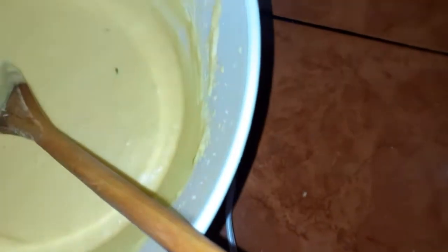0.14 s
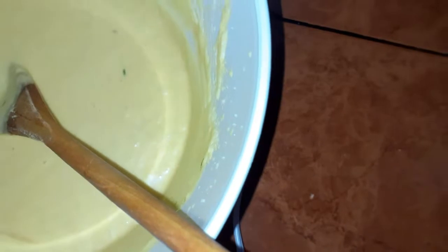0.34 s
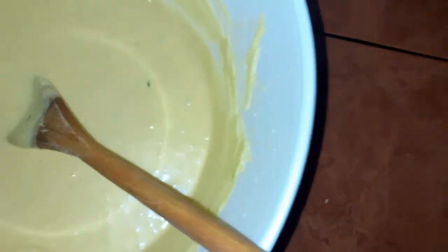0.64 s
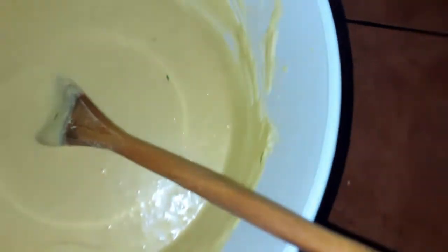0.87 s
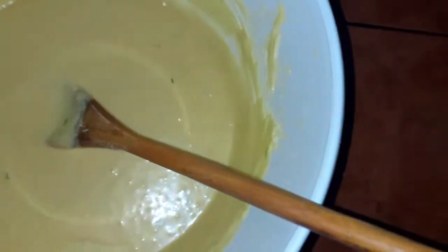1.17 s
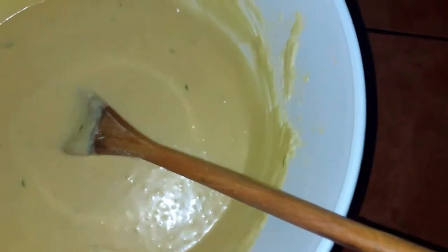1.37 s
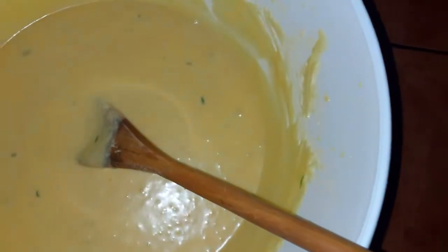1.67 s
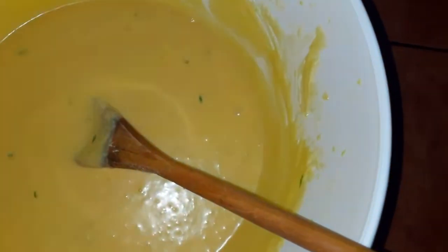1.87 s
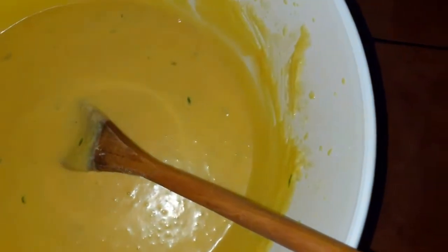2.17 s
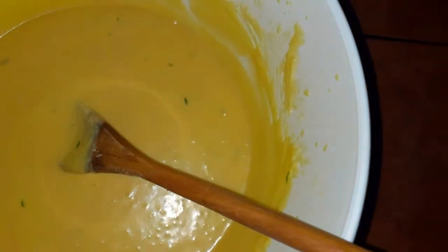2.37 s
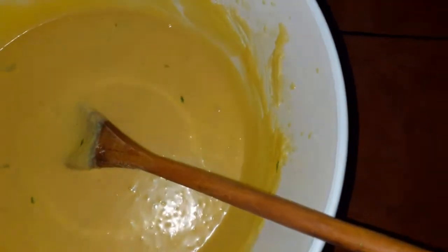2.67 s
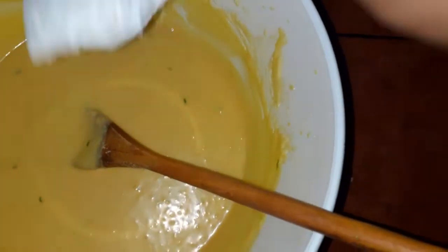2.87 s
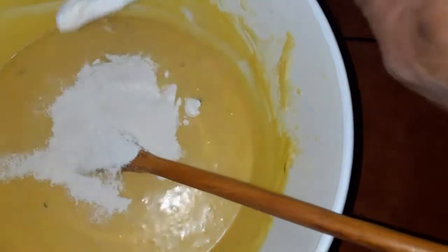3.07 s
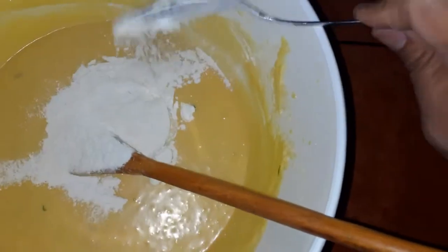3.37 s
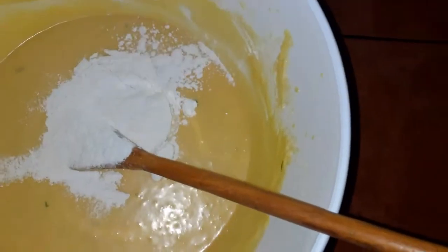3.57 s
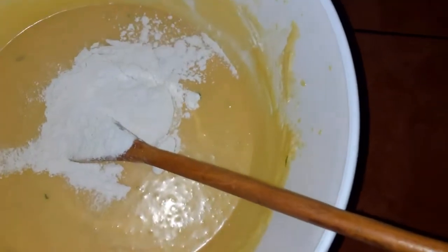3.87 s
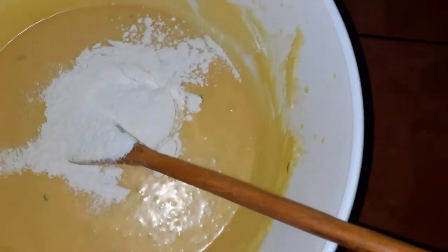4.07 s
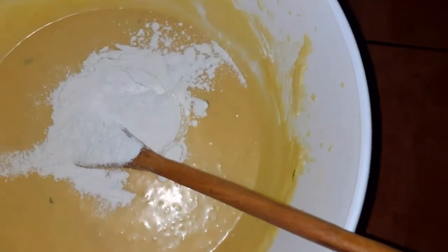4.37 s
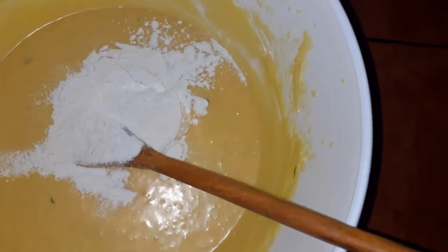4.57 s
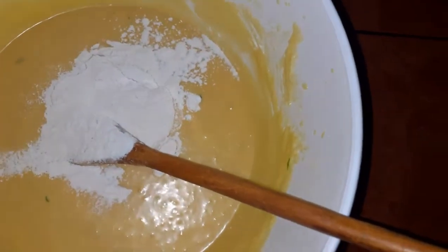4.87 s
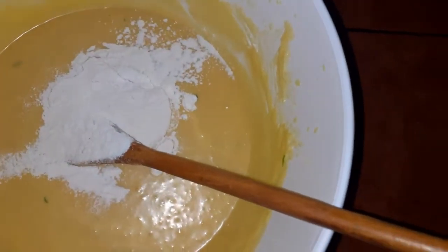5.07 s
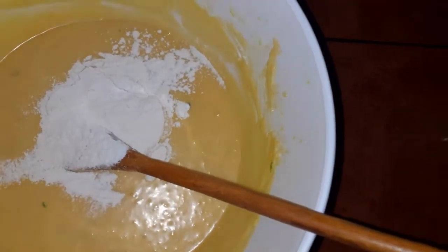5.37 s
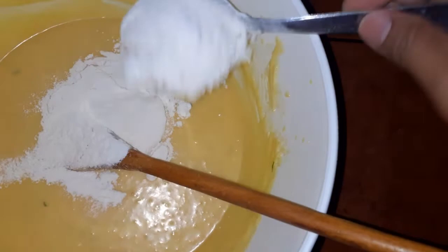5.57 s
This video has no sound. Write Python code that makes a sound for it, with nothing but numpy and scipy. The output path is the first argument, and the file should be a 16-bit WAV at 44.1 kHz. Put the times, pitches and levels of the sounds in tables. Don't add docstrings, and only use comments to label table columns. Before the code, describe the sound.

In a quiet, humming kitchen, a paper flour bag scuffs softly while a spoon knocks hollowly on a plastic tub, with small light taps.

```python
import sys
import numpy as np
from scipy import signal
from scipy.io import wavfile
from scipy.ndimage import uniform_filter1d

SR = 44100
rng = np.random.default_rng(int(sys.argv[2]) if len(sys.argv) > 2 else 0)


def log_audio(samples):
    frames = np.atleast_2d(samples).T
    limited = np.clip(frames, -1, 1)
    pcm = np.round(limited * 32767).astype(np.int16)
    wavfile.write(sys.argv[1], SR, pcm)


def magnitude_from_level(level_db):
    exponent = np.asarray(level_db, float) / 20
    return 10 ** exponent


N = 252384
SPAN = 36000
LAG = 14

# (frequency [Hz], level [dB per Hz])
WASH_COLOUR = [(24, -23.5), (40, -3), (64, -1), (80, -6), (109, 3), (158, -10.5), (193, -15.5), (295, -5),
               (342, -5.5), (578, -27), (1080, -29.5), (2010, -36.5), (3760, -61), (7560, -44.5),
               (15600, -61)]
# (frequency [Hz], likeness [-1 to 1])
WASH_LIKENESS = [(60, 1), (99, 0.82), (160, 1), (270, 0.73), (450, 0.69), (740, 0.01), (1220, -0.73),
                 (2010, -0.6), (3330, -1.4), (5500, -1.5), (9080, -0.42), (15000, 0.94)]
# (frequency [Hz], left minus right [dB])
WASH_BALANCE = [(60, -8), (110, 3), (200, -4.5), (380, -2), (700, -9.5), (1290, -9.5), (2380, -15.5),
                (4400, -5), (8120, -9.5), (15000, 8.5)]
# (time [s], level [dB])
WASH_SWELL = [
    (0.14, -52),
    (0.52, -54.5),
    (2.6, -54.5),
    (2.82, -49.5),
    (3.51, -55),
    (3.661, -49),
    (4.371, -64),
    (4.78, -61),
    (5.05, -51),
    (5.72, -53.5),
]
# (frequency [Hz], level [dB], width of the wavering [Hz])
FRIDGE_HUM = [
    (60.101, -63, 0.14),
    (111.3, -59, 30),
    (290.3, -62, 12),
    (346, -69.5, 20),
]

# (frequency [Hz], time to fall 60 dB [s])
ROOM_DECAY = [(150, 0.57), (400, 0.79), (1040, 0.79), (2760, 0.84), (4500, 0.87), (6000, 0.77),
              (12000, 0.7)]
# (frequency [Hz], likeness [-1 to 1])
ROOM_LIKENESS = [(60, 1), (99, 1), (160, 0.73), (270, 1), (450, 0.78), (740, 0.09), (1220, -0.0049),
                 (2010, 0.08), (3330, -0.043), (5500, -0.1), (9080, 1), (15000, 0.87)]
# (frequency [Hz], left minus right [dB])
ROOM_BALANCE = [(60, -2), (110, 0), (200, -3), (380, -2.5), (700, 0.5), (1290, -4), (2380, -4.5),
                (4400, -3.5), (8120, -6), (15000, 4.5)]
# (delay [ms], level [dB])
CLOSE_ECHOES = [(4.1, -16), (8.3, -25.5), (11, -29), (17, -19)]
# (frequency [Hz], level [dB])
CRACK_COLOUR = [(300, -45.5), (3000, -9.5), (4000, 5), (8500, -4), (9500, -16), (16000, -13)]

# (time [s], level [dB], treble [dB], hiss [dB], stroke length [s])
BAG_SCUFFS = [(-.04, -38, -14, -18, 0.06735), (4.261, -59.5, -19, -9.5, 0.042), (4.76, -67, 0, 6, .2),
              (4.85, -51.5, -10.5, -18.5, 0.0946), (1.596, -55, -29, -34, 0.023),
              (2.364, -40, -20.5, -20.5, 0.07), (2.628, -32, -24, -29.5, 0.042),
              (2.852, -37, -17, -27.5, 0.025), (3.508, -44, -19, -20, 0.036),
              (3.597, -41.5, -12.5, -30, 0.36), (3.844, -34.5, -11, -23.5, 0.038),
              (4.9545, -29.5, -22, -31, 0.026), (5.125, -26, -11.5, -22, 0.027),
              (5.258, -24, -12.5, -25, 0.011)]
# (time [s], level [dB], treble [dB], hiss [dB], stroke length [s])
LOOSE_PAPER_SCUFFS = [
    (3.542, -38.5, -10.5, -22, 0.047),
    (5.643, -41.5, -15, -27, 0.04),
]
# (frequency [Hz], level [dB per Hz])
PAPER_COLOUR = [(59, -35.5), (100, -8), (197, -19), (350, 0), (389, -9), (662, -12), (910, -9),
                (1080, -14.5), (1550, -13), (1760, -11.5), (3120, -18), (8110, -18.5), (10000, -32.5),
                (13200, -29), (16000, -44.5)]
# (time [s], level [dB], pitch [Hz], stroke length [s])
RINGING_FOLDS = [(2.635, -53, 2840, 0.0455), (2.64, -63, 6702, .04), (2.856, -51, 3860, .02),
                 (3.547, -50.5, 4340, 0.039), (3.582, -45.5, 1200, 0.013), (5.133, -32, 1528, 0.05635),
                 (5.143, -59, 900, 0.0596), (5.269, -33.5, 1524, 0.022), (5.327, -61, 1100, .06),
                 (4.801, -67, 4360, 0.13), (4.95, -45, 1680, .008)]

# (time [s], blow [dB], crack [dB], sent to the room [dB])
LID_TAP_EVENTS = [
    (0.1197, -24, -17, -11),
]
# (frequency [Hz], left [dB], right [dB], time to fall 60 dB [s], rise [ms])
LID_TONES = [(370, -1, 0.5, 0.031, 0.61), (974, -10, -14, .03, .6), (1930, -18, -1, 0.014, .4)]

# (time [s], blow [dB], crack [dB])
WOOD_EVENTS = [
    (0.319, -18, -1.5),
    (0.485, -11.5, -10.5),
]
# (frequency [Hz], left [dB], right [dB], time to fall 60 dB [s], rise [ms])
WOOD_TONES = [(155.3, -13.5, -12.5, 0.19, 0.33), (326, -6.5, -7.5, 0.11, 0.53), (594, -21, -2.5, 0.03, 1.5),
              (839, -2.5, -9.5, 0.066, 0.72), (967, 0, 0, 0.039, 1.54), (1627, -18, -4.5, 0.027, 1.1),
              (1980, 1, 6.5, 0.014, 0.28)]
# (frequency [Hz], level [dB per Hz])
WOOD_ROOM_COLOUR = [(59, -32), (100, -8), (206, -21), (295, -2.5), (381, -9.5), (676, -12.5), (970, -1.5),
                    (1420, -23.5), (2130, -17.5), (3860, -22.5), (9820, -43.5), (14400, -44.5),
                    (16000, -53)]

# (time [s], blow [dB], crack [dB], thud [dB])
FREE_TAPS = [
    (2.9794, -24, -14, 6),
    (2.9930, -24.5, -19, 0),
    (4.9554, -25, -19.5, 2),
]
# (time [s], blow [dB], crack [dB], thud [dB])
HELD_TAPS = [
    (2.9848, -28.5, -20, -6),
    (5.1294, -24, -16, 1),
    (5.263, -17, -15, -4),
]
# (frequency [Hz], left [dB], right [dB], time to fall 60 dB [s], rise [ms])
RIM_TONES = [(400, -10.5, -19, 0.069, 9), (630, 4, 6.5, 0.007, 0.69), (1253.8, -1, 2.5, 0.01, 0.82),
             (1810, -26, -4, 0.01, 0.33)]

# (time [s], blow [dB], base tone [dB], wall tone [dB])
SPOON_KNOCKS = [
    (3.247, -5.5, -12, -17),
    (3.389, -5.5, -11.5, -21.5),
    (5.592, -11.5, -16, -10.5),
]
# (time [s], blow [dB], crack [dB], thud [dB])
SPOON_BOUNCES = [
    (3.2587, -23.5, -3, 0),
    (3.2659, -22.5, -15.5, 12),
    (3.2748, -25, -28.5, 4),
    (3.4067, -22.5, -23.5, 10.5),
    (3.4335, -27, -28, 13),
    (5.6063, -37.5, -24, 19),
    (5.650, -39.5, -3, 12),
]
# (frequency [Hz], left [dB], right [dB], time to fall 60 dB [s], rise [ms])
TUB_TONES = [(78, -24, -22, .25, 9.), (162, -21, -19, .13, 4.), (265, -16, -15, .04, 3.),
             (350, -8, -7, .035, 3.), (545, 5, 4, .018, 3.2), (1170, -9, -3.5, .026, 1.1),
             (1840, -12, 5.5, .013, .95), (2030, -12, 8, .012, .95), (2430, -5, -7, .011, .9)]
# (frequency [Hz], left [dB], right [dB], time to fall 60 dB [s], rise [ms])
BASE_TONES = [(296, -1.3, 0.0015, 0.031, 1.87)]
# (frequency [Hz], left [dB], right [dB], time to fall 60 dB [s], rise [ms])
WALL_TONES = [(990, -8.5, 0, 0.028, 1.1)]
# (frequency [Hz], level [dB per Hz])
TUB_ROOM_COLOUR = [(59, -27), (100, -10), (170, -5.5), (214, -7), (348, -0.5), (744, -15), (863, -14.5),
                   (1070, -18), (1210, -14), (1460, -18), (2190, -15.5), (2700, -29.5), (5780, -40),
                   (8100, -42), (15600, -57)]

TUB_LATE, WOOD_LATE = .0019, -.0006
NO_CRACK_DB, NO_ROOM_DB = -40, -40


def evened(x):
    return x / np.sqrt(np.mean(x ** 2) + 1e-20)


def read(points, hz):
    f, value = np.transpose(points)
    return np.interp(np.log(hz + 1), np.log(f + 1), value)


def add(mix, s, sound):
    at = round(s * SR)
    part = mix[:, max(at, 0):]
    sound = sound[:, max(-at, 0):]
    count = min(part.shape[1], sound.shape[1])
    part[:, :count] += sound[:, :count]


def colour(x, points, treble_db=0, hiss_db=0, bass_db=0):
    hz = np.abs(np.fft.fftfreq(4096, 1 / SR)) + 1
    tilt_db = treble_db / (1 + (2900 / hz) ** 10)
    tilt_db += (hiss_db - treble_db) / (1 + (5900 / hz) ** 10)
    tilt_db += bass_db / (1 + (hz / 520) ** 6)
    log_gain = np.log(magnitude_from_level(np.maximum(read(points, hz) + tilt_db, -100)))
    response = np.exp(np.conj(signal.hilbert(log_gain)))
    taps = np.fft.ifft(response).real[:2048]
    return signal.oaconvolve(x, taps / np.linalg.norm(taps))[:len(x)]


def pair_noise(count, likeness, balance, shape):
    frames = count // 128 + 5
    hz = np.fft.rfftfreq(512, 1 / SR)[:, None]
    a, b, c, d = rng.standard_normal((frames, 257, 4)).T
    like = np.clip(read(likeness, hz), -1, 1)
    half_db = read(balance, hz) / 2
    left = a + 1j * b
    right = like * left + np.sqrt(1 - like ** 2) * (c + 1j * d)
    spectra = np.array([left * magnitude_from_level(half_db), right * magnitude_from_level(-half_db)])
    spectra *= magnitude_from_level(shape(hz, np.arange(frames) * 128 / SR))
    return signal.istft(spectra, nperseg=512, noverlap=384)[1][:, :count]


def kitchen():
    at, level_db = np.transpose(WASH_SWELL)

    def wash_db(hz, s):
        swell_db = np.interp(s, at, level_db - level_db.mean())
        return read(WASH_COLOUR, hz) + swell_db / (1 + (hz / 300) ** 3)

    wash = evened(pair_noise(N, WASH_LIKENESS, WASH_BALANCE, wash_db))
    t, hum = np.arange(N) / SR, np.zeros(N)
    for hz, db, width in FRIDGE_HUM:
        memory = np.exp(-np.pi * width / SR)
        jitter = rng.standard_normal(N) + 1j * rng.standard_normal(N)
        drift = signal.lfilter([1], [1, -memory], jitter)
        tone = (np.std(drift) + drift) * np.exp(2j * np.pi * hz * t)
        hum += magnitude_from_level(db) * evened(tone.real)
    return magnitude_from_level(-53) * wash + hum * magnitude_from_level([[-1.5], [1.5]])


def room(points, build_s, *shelves_db):
    patches = rng.standard_normal((SPAN // 128 + 5, 257)).T
    lumps_db = 2.2 * evened(uniform_filter1d(patches, size=30))

    def tail_db(hz, s):
        return lumps_db - 60 * s / np.maximum(read(ROOM_DECAY, hz), .1)

    tail = pair_noise(SPAN, ROOM_LIKENESS, ROOM_BALANCE, tail_db)
    tail *= 1 - np.exp(-np.arange(SPAN) / SR / build_s)
    tail = tail / np.linalg.norm(tail[1])
    return np.array([colour(side, points, *shelves_db) for side in tail])


def scuff(s, level_db, length, points, *shelves_db):
    t, length = np.arange(16384) / SR, max(length, .003)
    stroke = (1 - np.exp(-t / length / 0.21)) * np.exp(-(t / length / 2) ** 2)
    lumps_db = 6.6 * uniform_filter1d(rng.standard_normal(len(t)), 40)
    grains = rng.standard_normal(len(t)) * magnitude_from_level(lumps_db)
    rub = colour(evened(grains) * stroke, points, *shelves_db)
    sound = magnitude_from_level(33.5) * room(points, 0.64 * length, *shelves_db)
    sound[:, :len(t)] += magnitude_from_level(-10) * np.array([np.roll(.6 * rub, LAG), rub])
    return s - .003, magnitude_from_level(level_db - 1.0) * sound


def paper_scuffs(mix):
    for rows, loose in ((BAG_SCUFFS, False), (LOOSE_PAPER_SCUFFS, True)):
        for s, level_db, treble_db, hiss_db, length in rows:
            bass_db = -24 if loose else -7.5 - .33 * (level_db + 37)
            shelves_db = treble_db + 8.5, hiss_db + 17, bass_db + 7
            add(mix, *scuff(s, level_db, length, PAPER_COLOUR, *shelves_db))


def knock(row, tones, room_colour, late_s, snap_s):
    s, blow_db, boom_db, crack_db, thud_db, send_db = row
    t, body = np.arange(8192) / SR, np.zeros((2, SPAN))
    for hz, left_db, right_db, t60, rise_ms in tones:
        ring = (1 - np.exp(-(t * 1000 / rise_ms) ** 2)) * magnitude_from_level(-60 * t / t60)
        weight_db = boom_db if hz < 220 else thud_db if hz < 750 else 0
        wave = magnitude_from_level(weight_db) * ring * np.sin(2 * np.pi * hz * t)
        body[:, :len(t)] -= magnitude_from_level([[left_db], [right_db]]) * wave
    snap = (1 - np.exp(-t / snap_s * 25)) * magnitude_from_level(-60 * t / snap_s)
    for side, side_db in zip(body, (-4, 0)):
        crack = colour(rng.standard_normal(len(t)) * snap, CRACK_COLOUR)
        side[:len(t)] += magnitude_from_level(crack_db + side_db) * crack
    body[0] = np.roll(body[0], LAG)
    near = body.copy()
    for ms, db in CLOSE_ECHOES:
        near += magnitude_from_level(db) * np.roll(body * [[1.6], [.8]], round(ms * SR / 1000), 1)
    if send_db > -19:
        near += magnitude_from_level(send_db + 22.5) * room(room_colour, 0.001)
    return s + late_s, magnitude_from_level(blow_db) * near


def lid_taps(mix):
    for s, blow_db, crack_db, send_db in LID_TAP_EVENTS:
        row = s, blow_db, 0, crack_db, 0, send_db
        add(mix, *knock(row, LID_TONES, TUB_ROOM_COLOUR, 0, 0.012))


def wood_knocks(mix):
    for s, blow_db, crack_db in WOOD_EVENTS:
        row = s, blow_db, 1.2, crack_db, 1.2, -19 - blow_db
        add(mix, *knock(row, WOOD_TONES, WOOD_ROOM_COLOUR, WOOD_LATE, 0.024))


def bag_folds(mix):
    for s, level_db, hz, length in RINGING_FOLDS:
        width = hz / 11
        band = [(hz - 2 * width, -40), (hz - width, -3), (hz, 0), (hz + width, -3), (hz + 2 * width, -40)]
        add(mix, *scuff(s, level_db, length, band))


def rim_taps(mix):
    for rows, send_db in ((FREE_TAPS, -10.5), (HELD_TAPS, NO_ROOM_DB)):
        for s, blow_db, crack_db, thud_db in rows:
            row = s, blow_db, 0, crack_db, thud_db, send_db
            add(mix, *knock(row, RIM_TONES, TUB_ROOM_COLOUR, 0, 0.012))


def tub_knocks(mix):
    full_parts_db = np.array([-0.5, -16, 1.5, -12.5])
    full_blow_db, softening = -2.5, 0.53
    for s, blow_db, base_db, wall_db in SPOON_KNOCKS:
        for db, tones in ((base_db, BASE_TONES), (wall_db, WALL_TONES)):
            row = s, db, 0, NO_CRACK_DB, 0, NO_ROOM_DB
            add(mix, *knock(row, tones, TUB_ROOM_COLOUR, TUB_LATE, 0.01))
        parts_db = full_parts_db + softening * (blow_db - full_blow_db)
        add(mix, *knock((s, blow_db, *parts_db), TUB_TONES, TUB_ROOM_COLOUR, TUB_LATE, 0.0098))


def tub_bounces(mix):
    for s, blow_db, crack_db, thud_db in SPOON_BOUNCES:
        row = s, blow_db, -1.5, crack_db, thud_db, NO_ROOM_DB
        add(mix, *knock(row, TUB_TONES, TUB_ROOM_COLOUR, TUB_LATE, 0.01))


def scene():
    mix = kitchen()
    paper_scuffs(mix)
    lid_taps(mix)
    wood_knocks(mix)
    bag_folds(mix)
    rim_taps(mix)
    tub_knocks(mix)
    tub_bounces(mix)
    return mix


def roll_off(x):
    return signal.sosfilt(signal.butter(12, 16490, fs=SR, output="sos"), x)


def record(dry):
    low_cut = signal.butter(5, 50, "high", fs=SR, output="sos")
    top_edge = signal.ellip(8, .5, 70, 15900, fs=SR, output="sos")
    mix = signal.sosfilt(top_edge, signal.sosfilt(low_cut, dry))
    return roll_off(mix)


dry = scene()
out = record(dry)
log_audio(out)
```